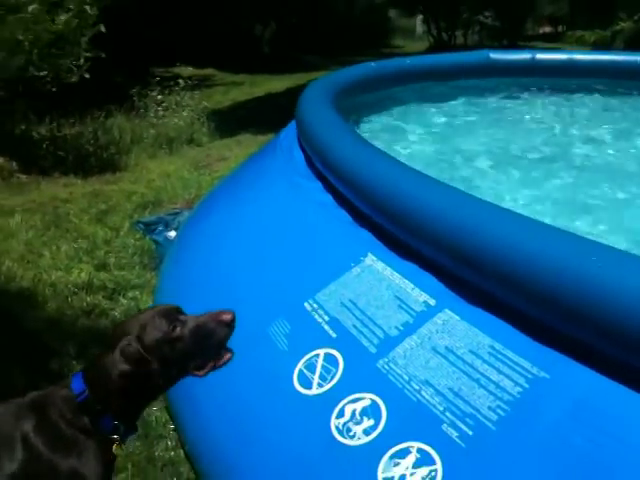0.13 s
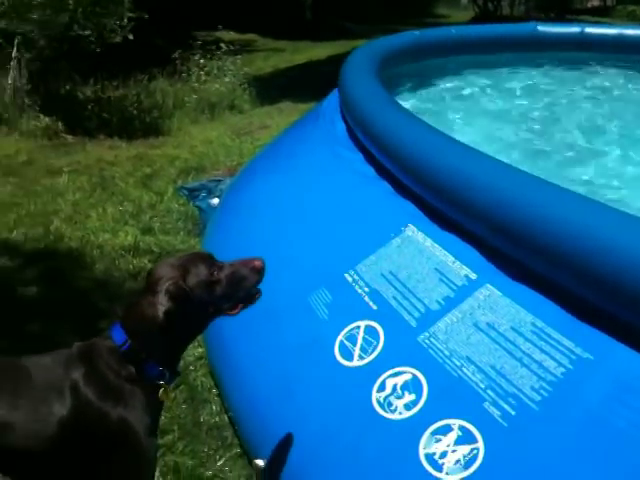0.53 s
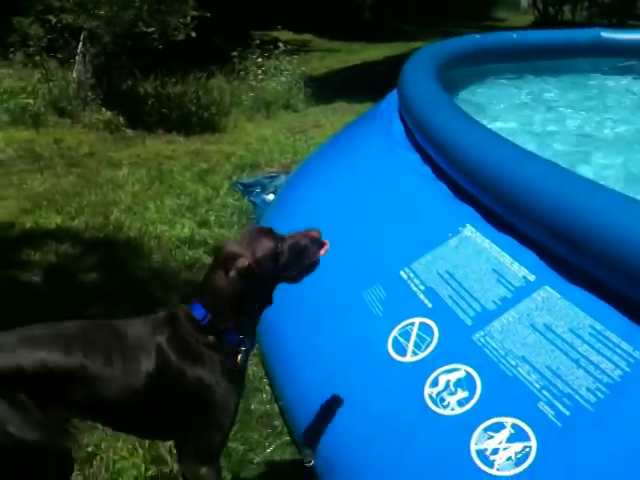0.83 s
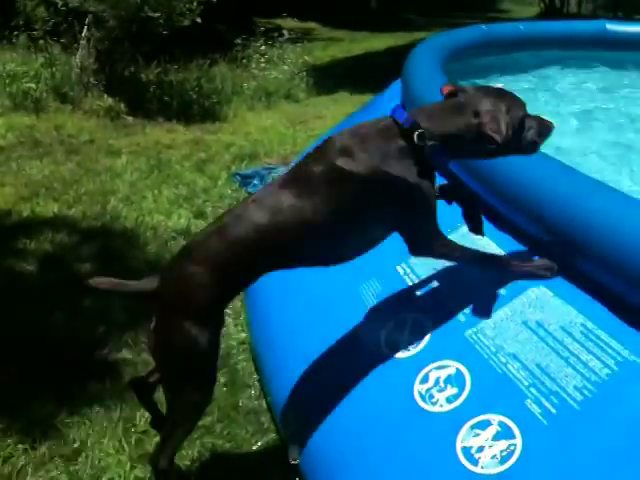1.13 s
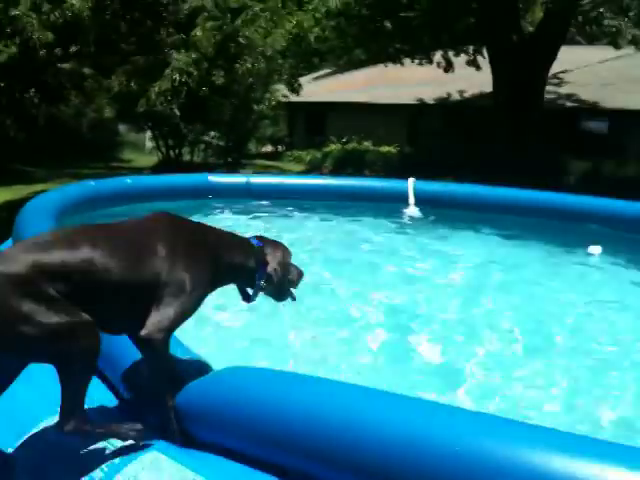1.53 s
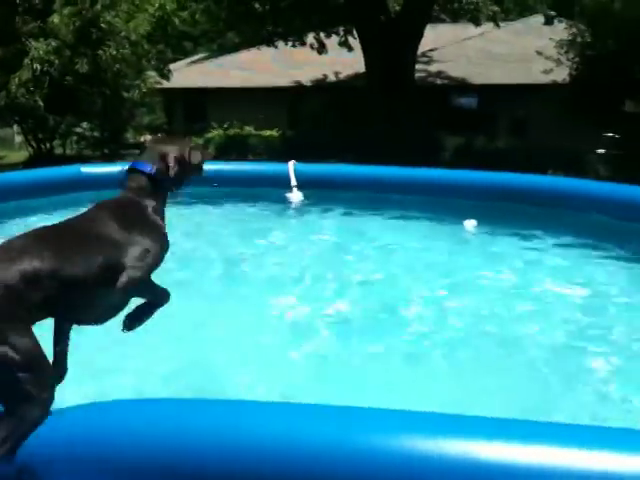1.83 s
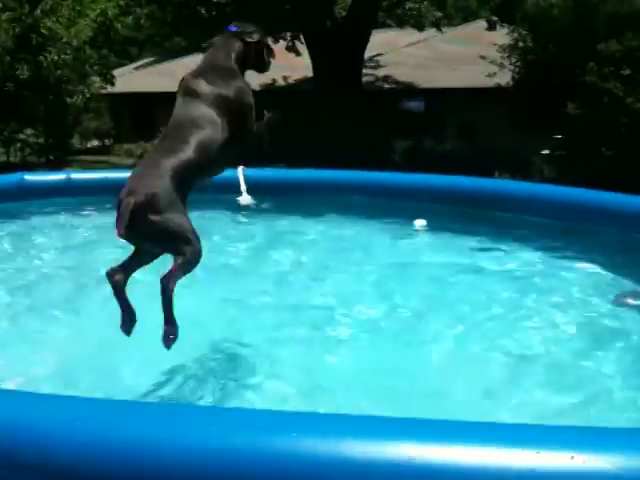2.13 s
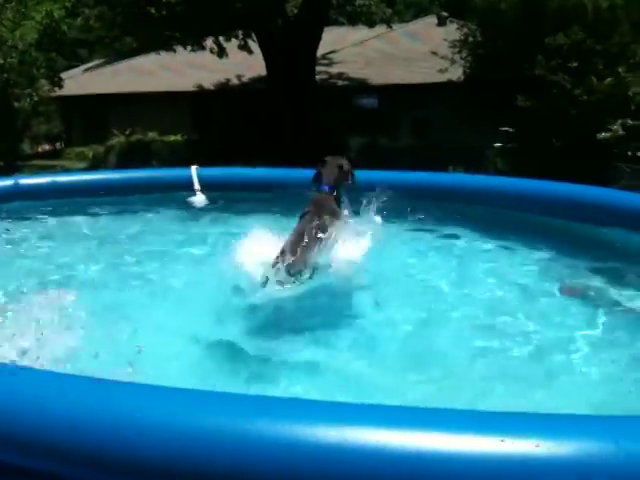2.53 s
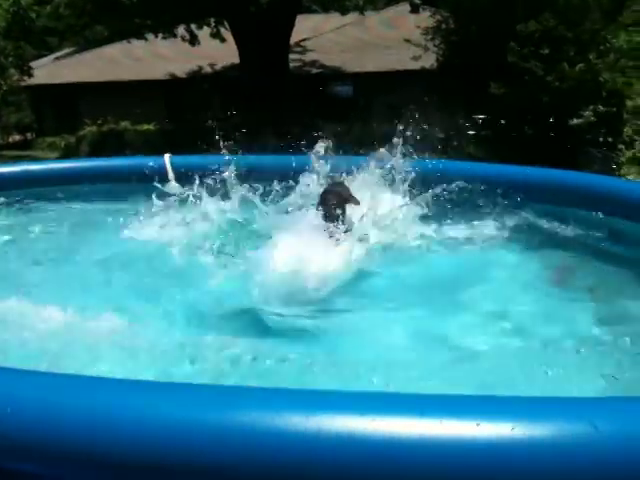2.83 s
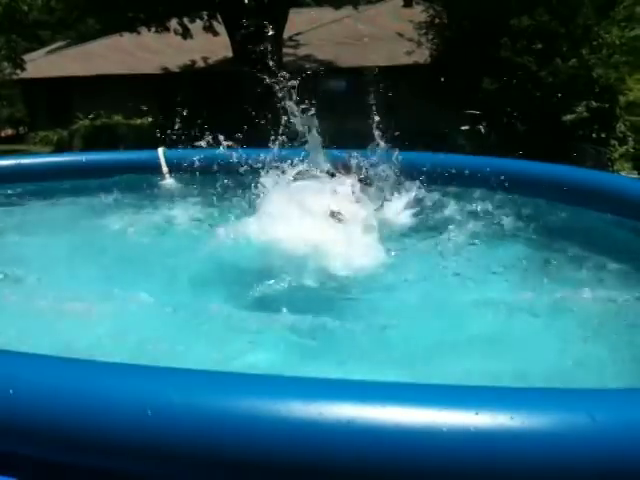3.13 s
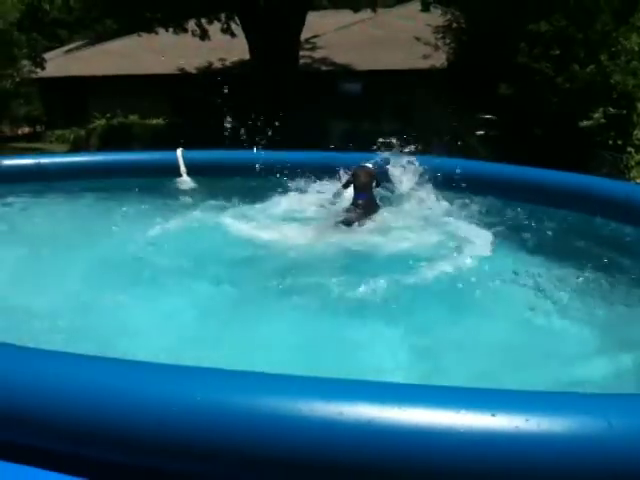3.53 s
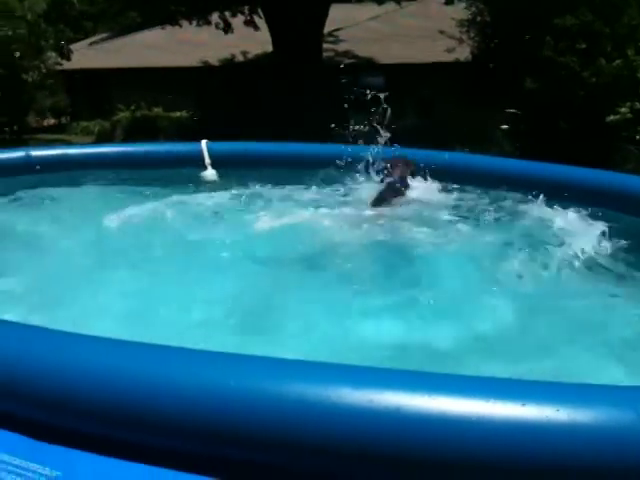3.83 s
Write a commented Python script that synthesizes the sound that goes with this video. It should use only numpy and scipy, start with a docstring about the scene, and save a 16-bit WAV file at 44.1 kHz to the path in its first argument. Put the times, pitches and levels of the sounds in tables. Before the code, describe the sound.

A dog's splash into an inflatable pool: quiet garden first, a wet slap, paws scrambling and squeaking on vinyl, then a sharp watery crash, glugs and churning, outdoors, on a handheld microphone with thin bass.

```python
"""A quiet garden with distant rush, faint hum and whine, and small ticks; then something slaps an inflatable pool.
A dog scrambles up the wet wall: water spills over the ring, pads squeak, and the air ring thumps under its paws.
It leaps and lands with a splash; spray, falling clumps of water, glugs, bubbles and sloshing follow.
Noise is shaped into rush, slaps, spills and cracks; short gliding sines make thumps, squeaks, glugs and bubbles.
The hits scatter in a short echo, and the microphone thins the deep bass and stops at a treble limit."""
import sys
import numpy as np
from scipy import signal
from scipy.fft import rfft, irfft, next_fast_len
from scipy.io import wavfile
from scipy.ndimage import uniform_filter1d, map_coordinates

SR = 44100
rng = np.random.default_rng(int(sys.argv[2]) if len(sys.argv) > 2 else 0)


def digitize_waveform(pressure):
    """Quantize a signal to 16-bit integers and store it at the path in sys.argv[1].

    Rows of a 2-D input are taken as channels; values are limited to [-1, 1].
    """
    field = np.atleast_2d(pressure).T
    bounded = np.clip(field, -1, 1)
    quanta = np.round(bounded * 32767).astype(np.int16)
    wavfile.write(sys.argv[1], SR, quanta)


N = 176400  # samples, 4 s


def amp(db):
    """dB to gain."""
    return 10 ** (np.asarray(db) / 20)


def unit(x):
    """Scaled to rms 1."""
    return x / np.sqrt(np.mean(x ** 2) + 1e-20)


def along(points, hz):
    """Values at hz, read between (frequency, value) points on a log axis."""
    f, v = np.transpose(points)
    return np.interp(np.log(hz + 1), np.log(f + 1), v)


def bell(centre_hz, width_oct, edge_db, floor_db):
    """A band that is edge_db down at width_oct octaves from its centre, never below floor_db."""
    return lambda f: np.maximum(-edge_db * (np.log2((f + 1) / centre_hz) / width_oct) ** 2, floor_db)


def wobble(rate):
    """A smooth random curve, rate knots a second."""
    knots = rng.standard_normal(int(N * rate / SR) + 4)
    return map_coordinates(knots, [np.arange(N) * rate / SR])


def coloured(x, spectrum):
    """The last axis of x filtered to a spectrum in dB."""
    n = x.shape[-1]
    m = next_fast_len(n + 2048)  # padding keeps the filter from wrapping round
    gain = amp(spectrum(np.fft.rfftfreq(m, 1 / SR)))
    return irfft(rfft(x, m) * gain, m)[..., :n]


def rush(spectrum, patchy_db):
    """Noise of rms 1 with patches of random gain in time and frequency."""
    z = signal.stft(rng.standard_normal(N), nperseg=256)[2]
    field = uniform_filter1d(rng.standard_normal(z.shape), size=5, axis=0)
    field = uniform_filter1d(field, size=7, axis=1)
    x = signal.istft(z * amp(patchy_db * unit(field)), nperseg=256)[1][:N]
    return unit(coloured(x, lambda hz: along(spectrum, hz)))


def place(s, rows):
    """Sum each row into the track from its start time."""
    at = np.round(np.asarray(s) * SR).astype(int)[:, None] + np.arange(rows.shape[1])
    return np.bincount(at.ravel(), rows.ravel(), N + rows.shape[1] + SR)[:N]


def blips(s, db, hz, cycles, rise, size, peak_at=0.28):
    """Bubble tones: a swell, a gliding pitch (by twice rise over the life), an end after some cycles."""
    t = np.arange(size) / SR
    life = (np.maximum(cycles, .5) / hz)[:, None]
    u = t / (peak_at * life)
    shape = (u * np.exp(1 - u)) ** 2.12
    tone = np.sin(2 * np.pi * hz[:, None] * t * (1 + rise * (t / life - .5)))
    return place(s, amp(db)[:, None] * shape * tone)


def swarm(spectrum, centre_hz, spread_oct, cycles, size_db, count, size):
    """Many random bubbles, together of rms 1, some larger than the rest."""
    hz = np.clip(centre_hz * 2 ** (spread_oct * rng.standard_normal(count)), 80, 16000)
    larger_db = size_db * np.minimum(rng.exponential(size=count), 3)
    db = larger_db + along(spectrum, hz) + 20 * np.log10(hz / centre_hz)
    starts = rng.uniform(0, N / SR, count)
    return unit(blips(starts, db, hz, cycles * rng.uniform(0.37, 1.41, count), 0.16, size))


def bursts(table, grains_db, cycles, tones_db, spread_db, rise):
    """Swells of uneven grit with ten short tones scattered through each."""
    s, length, db, hz, spread = np.transpose(table)[..., None]
    t = np.arange(6000) / SR
    lumps = uniform_filter1d(rng.standard_normal((len(s), len(t))), size=60, axis=1)
    grains = rng.standard_normal(lumps.shape) * amp(grains_db * lumps / lumps.std())
    band = coloured(grains, bell(hz, spread, edge_db=3, floor_db=-50))
    stroke = np.sin(np.pi * np.clip(t / length, 0, 1))
    grit = place(s[:, 0], amp(db) * stroke * band / band.std(axis=1, keepdims=True))
    when = rng.uniform(size=(len(s), 10))  # share of the swell
    pitch, loudness = np.moveaxis(rng.standard_normal((len(s), 10, 2)), 2, 0)
    level_db = db + tones_db + spread_db * loudness + 20 * np.log10(np.sin(np.pi * when))
    tone_hz = np.clip(hz * 2 ** (spread * pitch), 150, 12000)
    starts = s + length * when
    return grit + blips(starts.ravel(), level_db.ravel(), tone_hz.ravel(), cycles, rise, size=2500)


# Distant garden rush: (frequency [Hz], relative level [dB])
GARDEN_SPECTRUM = [(15, -53), (30, -1), (107, 2), (236, -3), (523, -8), (879, -11.5), (1610, -18),
                   (1890, -18), (7050, -21), (14000, -25), (15200, -24), (17400, -26)]
# Steady hum tones: (frequency [Hz], level [dB], 6 dB under the tone's peak)
HUM_TONES = [(161.5, -80.5), (242.2, -79.5), (301.5, -80.5)]
GARDEN_DB, HUM_WANDER = -64.5, .0015  # rush level; share of the hum pitch
WHINE_HZ, WHINE_WIDTH_HZ, WHINE_DB = 15030, 35, -85


def garden():
    """Distant outdoor rush of patchy noise, wandering hum sines and a faint narrow-band whine."""
    hum = 0
    for hz, db in HUM_TONES:
        turns = hz / SR * np.cumsum(1 + HUM_WANDER * wobble(47))
        hum = hum + amp(db + 6.0) * np.sin(2 * np.pi * turns)
    whine_band = lambda f: np.maximum(-6 * ((f - WHINE_HZ) / WHINE_WIDTH_HZ) ** 2, -80)
    whine = unit(coloured(rng.standard_normal(N), whine_band))
    distant = amp(GARDEN_DB + 0.13 * wobble(5.9)) * rush(GARDEN_SPECTRUM, patchy_db=1.95)
    return distant + hum + amp(WHINE_DB) * whine


# Small ticks and drops: (time [s], level [dB], pitch [Hz], 60 dB decay [s], share of broad crack [0-1])
SMALL_TICKS = [(0.144, -49, 1930, 0.0085, 0.65), (0.151, -47.5, 6290, 0.01, 0.1),
               (0.214, -52, 805, 0.0089, 0.3), (0.23, -38, 5720, 0.0069, 0.45),
               (0.314, -49, 2050, 0.011, 0.6), (0.323, -45, 2450, 0.0087, 0.5),
               (0.386, -42.5, 5300, 0.0081, 0.25), (0.492, -47, 1750, 0.014, 0.4),
               (0.511, -47.5, 860, 0.019, 0.2), (0.657, -48.5, 925, 0.014, 0.8),
               (0.915, -38, 3000, 0.014, 0.3), (0.976, -32.5, 6200, 0.0081, 0.47),
               (1.002, -41, 5980, 0.013, 0.6), (1.016, -37, 3730, 0.01, 0.1),
               (1.215, -31.5, 8700, 0.01, 0.43), (1.363, -53, 2030, 0.0091, 0.5),
               (1.427, -45, 1280, 0.012, 0.6), (1.485, -44, 2350, 0.015, 0.2),
               (1.598, -41, 6200, 0.009, 0.6), (1.605, -47, 4200, 0.011, 0.5),
               (1.686, -36, 5000, 0.0099, 0.6), (1.697, -28, 865, 0.0095, 0.44),
               (1.725, -29, 4820, 0.0084, 0), (1.846, -33, 880, 0.0091, 0.74),
               (1.879, -32.5, 3770, 0.0096, 0.3), (1.968, -42, 696, 0.017, 0.7),
               (2.018, -34, 9500, 0.015, 0.4), (2.182, -33, 1080, 0.008, 0.8),
               (2.419, -46, 1010, 0.01, 0.3), (3.827, -47, 820, 0.011, 0.3), (3.944, -34, 3470, 0.01, 0.3),
               (3.959, -28, 2730, 0.011, 0.6)]
TICK_OCT = 0.6  # octaves from the pitch to where the crack is 6 dB down


def ticks():
    """Each tick is a very short decaying ring mixed with a crack of noise about its pitch."""
    s, db, hz, t60, crack = np.transpose(SMALL_TICKS)[..., None]
    t, crack = np.arange(1500) / SR, np.clip(crack, 0, 1)
    noise = coloured(rng.standard_normal((len(s), len(t))), bell(hz, TICK_OCT, edge_db=6, floor_db=-60))
    ring = (1 - crack) * np.sin(2 * np.pi * hz * t)
    both = ring + crack * noise / noise.std(axis=1, keepdims=True)
    onset = np.minimum(t / 0.0011, 1)
    return place(s[:, 0], both * onset * amp(db - 60 * t / np.maximum(t60, .002)))


ECHO_DB, ECHO_T60_S = -15, .07


def echo(x):
    """A short scatter off the pool wall and water: a decaying noise tail that starts after 3 ms."""
    t = np.arange(SR // 4) / SR
    tail = rng.standard_normal(len(t)) * amp(-60 * t / ECHO_T60_S) * (t > .003)
    return signal.fftconvolve(x, tail / np.linalg.norm(tail))[:N]


# Water by phase (first slap, climb, balance, push-off, flight, landing, paddling):
# (time [s], spray and scuffing level [dB], burble level [dB], slosh level [dB])
WATER_LEVELS = [
    [(0.74, -88, -91, -74), (0.794, -60, -56, -80), (0.922, -63, -77, -93), (1.15, -69.5, -73, -77)],
    [(1.16, -60, -74, -80), (1.214, -56.5, -66, -54), (1.356, -60.5, -61.5, -55), (1.57, -60.5, -68, -73)],
    [(1.58, -58.5, -80, -72), (1.708, -50.5, -53, -59), (1.81, -58, -61.5, -65), (1.926, -55, -59.5, -52),
     (2.02, -64, -57, -59)],
    [(2.03, -55.5, -58.5, -50.5), (2.19, -48, -45, -49)],
    [(2.2, -53.5, -48.5, -54), (2.44, -56.5, -51, -50)],
    [(2.45, -53.5, -54, -48), (2.518, -47, -53, -55), (2.54, -38, -48, -48.5), (2.644, -39, -38, -39),
     (2.734, -38.5, -38, -39.5), (2.822, -42, -40, -41.5), (2.956, -38, -36, -40.5),
     (3.1, -39, -41.5, -46.5)],
    [(3.11, -41, -40.5, -51.5), (3.332, -41, -39.5, -45.5), (3.752, -44.5, -44.5, -57),
     (4.0, -42.5, -47, -52)],
]
# Colours of the three water layers, each (frequency [Hz], relative level [dB])
SPRAY_SPECTRUM = [(710, -50), (1200, -5), (1900, -13), (2630, -5.5), (2970, -11.5), (3510, -6.5),
                  (3970, -9), (5680, -7), (16500, -20), (17400, -27)]
BURBLE_SPECTRUM = [(240, -38), (400, 3), (512, -6.5), (912, 3), (1040, -2.5), (1900, -6), (2400, -6.5),
                   (3120, -17), (5280, -120)]
SLOSH_SPECTRUM = [(15, -61), (35, -4), (97, -38), (149, -0.5), (194, 2.5), (348, 1), (430, -1.5),
                  (512, -11.5), (600, -1.5), (780, -11), (1320, -120)]
LEAP_ENDS_S = 2.45  # scuffing grit before, sparse droplets after
GRIT_DB, GRIT_OCT, GRIT_SIZE_DB = -7, 1.2, 8  # level against the spray track
DROPS_DB, DROPS_HZ, DROPS_OCT, DROPS_CYCLES, DROPS_SIZE_DB = -11, 2400, .8, 6, 4  # level likewise


def water():
    """Patchy rush and bubble swarms make spray, burble and slosh; grit on the wall, then droplets, join."""
    s, *cols = np.concatenate(WATER_LEVELS).T
    t = np.arange(N) / SR
    spray_db, burble_db, slosh_db = [np.interp(t, s, c, left=-120) for c in cols]
    shared = 0.64 * wobble(34.67)  # dB, moves spray and burble together
    spray = 0.73 * rush(SPRAY_SPECTRUM, patchy_db=2.0)
    spray = spray + 0.37 * swarm(SPRAY_SPECTRUM, 4070, 0.845, 5.3, 4.2, count=7000, size=200)
    grit = swarm(SLAP_SPECTRUM, 3000, GRIT_OCT, 1.2, GRIT_SIZE_DB, count=1500, size=300)
    grit = amp(GRIT_DB) * (t < LEAP_ENDS_S) * grit
    drops = swarm(SPRAY_SPECTRUM, DROPS_HZ, DROPS_OCT, DROPS_CYCLES, DROPS_SIZE_DB, count=1600, size=500)
    drops = amp(DROPS_DB) * (t > LEAP_ENDS_S) * drops
    burble = 0.65 * rush(BURBLE_SPECTRUM, patchy_db=-1.0)
    burble = burble + 0.5 * swarm(BURBLE_SPECTRUM, 938, 0.557, 7.3, 1.6, count=1600, size=1200)
    slosh = 0.71 * rush(SLOSH_SPECTRUM, patchy_db=2.5)
    slosh = slosh + 0.42 * swarm(SLOSH_SPECTRUM, 264.0, 0.516, 5.4, 1.3, count=700, size=3000)
    bright = amp(spray_db + shared + 0.49 * wobble(110)) * (spray + grit + drops)
    middle = amp(burble_db + shared + 0.68 * wobble(30.35)) * burble
    return bright + middle + amp(slosh_db + 1.7 * wobble(15)) * slosh


# Wet slaps: (time [s], level [dB], strongest band [Hz], rise [s], 60 dB decay [s],
# sharp front over the noise [dB]); the noise crests at an rms 9.5 dB under the level
WET_SLAPS = [(0.7531, -23, 1880, 0.0011, 0.047, -15), (0.843, -42, 6400, 0.0058, 0.015, 4.5),
             (0.915, -36.5, 6360, 0.001, 0.023, 10), (0.9887, -40.5, 7040, 0.003, 0.022, 4.5),
             (1.258, -35.5, 1210, 0.004, 0.028, -2), (1.2745, -33, 1840, 0.001, 0.019, -12),
             (1.2816, -40, 1590, 0.0026, 0.025, 0), (1.3009, -43, 1680, 0.0026, 0.024, 4.5),
             (1.3434, -35.5, 1820, 0.0036, 0.013, 1), (1.357, -42, 4900, 0.005, 0.028, -5),
             (1.5797, -37, 6040, 0.0032, 0.019, 4.5), (1.7701, -30, 7440, 0.0021, 0.01, 4),
             (1.787, -33.5, 7700, 0.0014, 0.01, 8), (1.9943, -36, 1210, 0.004, 0.018, 3),
             (2.0993, -27, 4000, 0.0024, 0.058, 7), (2.1161, -23.5, 1670, 0.0017, 0.035, 2),
             (2.1296, -30, 1230, 0.0017, 0.095, 10), (2.15, -43, 1220, 0.0025, 0.025, 7),
             (2.317, -35, 4500, 0.002, 0.013, -2), (2.456, -28, 6500, 0.0055, 0.015, 0),
             (2.4786, -19, 5740, 0.0012, 0.013, -8), (2.4813, -18, 5650, 0.0015, 0.012, -8),
             (2.4856, -28, 1200, 0.004, 0.018, 1), (2.522, -17, 1700, 0.0005, 0.011, -12),
             (2.543, -24, 5500, 0.005, 0.04, -10), (2.5538, -17, 6700, 0.006, 0.024, -15),
             (2.5565, -17.5, 5260, 0.002, 0.019, -10), (2.5627, -18.5, 2410, 0.0023, 0.05, -5),
             (2.591, -16, 4550, 0.0037, 0.019, -13), (2.5955, -17, 2450, 0.001, 0.021, -11),
             (2.7799, -19.5, 1230, 0.0019, 0.039, 14), (2.94, -29, 1450, 0.0032, 0.028, -1),
             (3.2025, -25, 5400, 0.0022, 0.015, -4), (3.248, -29.5, 2090, 0.0034, 0.028, -12),
             (3.44, -26.5, 1340, 0.0031, 0.058, 4.5), (3.6814, -30, 5200, 0.0024, 0.02, 6),
             (3.699, -31, 6270, 0.0027, 0.018, 2), (3.8632, -27, 5340, 0.0026, 0.015, 4.5),
             (3.897, -26.5, 3540, 0.0021, 0.022, 0)]
# Colour common to slaps and scuffing grit: (frequency [Hz], relative level [dB])
SLAP_SPECTRUM = [(350, -67), (600, -9), (942, -3.5), (1960, -7.5), (2560, -4.5), (3690, -5.5), (7370, -7),
                 (17400, -21.5)]
SLAP_PEAK_DB, SLAP_PEAK_OCT = 10.5, 0.19  # boost of each slap's strongest band
SLAP_LOW_HZ, SLAP_LOW_POWER = 1000, 18  # steep low cut


def slaps():
    """Bright noise that builds to a sharp front and dies, each with its own strongest band."""
    s, db, hz, rise, t60, spike_db = np.transpose(WET_SLAPS)[..., None]
    t, rise = np.arange(5000) / SR, np.clip(rise, .0003, .02)

    def colour(f):
        boost = SLAP_PEAK_DB * np.exp(-.5 * (np.log2((f + 1) / hz) / SLAP_PEAK_OCT) ** 2)
        low_cut = 10 * np.log10(1 + (SLAP_LOW_HZ / (f + 1)) ** SLAP_LOW_POWER)
        return along(SLAP_SPECTRUM, f) + boost - low_cut

    noise = coloured(rng.standard_normal((len(s), len(t))), colour)
    decay = amp(-60 * np.maximum(t - rise, 0) / np.maximum(t60, .003))
    body = noise / noise.std(axis=1, keepdims=True) * np.minimum(t / rise, 1) ** 2 * decay
    spike = coloured(1. * (np.arange(len(t)) == np.round(rise * SR)), colour)
    front = amp(spike_db) * spike / spike.max(axis=1, keepdims=True)
    return place((s - rise / 2)[:, 0], (body - front) * amp(db - 9.5))


# Single bubbles: (time [s], peak level [dB], pitch [Hz], cycles [count], half the pitch climb [fraction])
SINGLE_BUBBLES = [(0.754, -35.5, 1090, 12, 0.03), (0.788, -47, 790, 8, 0.17), (0.808, -42, 820, 12, 0.03),
                  (0.832, -52, 840, 9, 0.03), (1.253, -41.5, 714, 4.9, 0.13), (1.756, -30, 800, 2.5, 0.11),
                  (1.774, -31, 664, 1.4, 0.32), (1.845, -52, 855, 7, 0.21), (1.993, -31.5, 630, 2.6, 0.095),
                  (2.103, -31.5, 1120, 7.8, 0.21), (2.117, -26.5, 897, 6.5, 0.55),
                  (2.317, -38, 1360, 10.5, 0.23), (2.374, -40, 816, 10, 0.32), (2.477, -30, 730, 4.2, 0.25),
                  (2.521, -26, 1130, 6.1, 0.31), (2.571, -28, 763, 7.1, 0.17), (2.632, -36, 650, 4.7, 0.29),
                  (2.662, -26, 890, 6.3, 0.21), (2.683, -31, 930, 5.3, 0.25), (2.779, -20, 850, 4, 0.096),
                  (2.875, -29, 890, 8, 0.16), (2.91, -39, 780, 7.1, 0.12), (2.936, -36, 626, 6.7, 0.22),
                  (2.98, -25.5, 664, 5.5, 0.17), (3.013, -35, 764, 5.6, 0.12), (3.046, -51, 920, 5, 0.25),
                  (3.079, -42, 443, 12.5, 0.25), (3.124, -33.5, 600, 7.3, 0.16), (3.134, -36, 640, 4, 0.27),
                  (3.204, -48, 1460, 8.1, 0.23), (3.251, -30, 850, 3.8, 0.2), (3.365, -32, 980, 3.4, 0.25),
                  (3.384, -35.5, 720, 8.1, 0.16), (3.431, -32.5, 497, 5.5, 0.32),
                  (3.44, -31.5, 740, 8.9, 0.33), (3.619, -35, 940, 7.5, 0.13), (3.744, -37, 840, 4.9, 0.23)]


def bubbles():
    """Each bubble rings briefly at its own pitch, climbing as it dies."""
    s, db, hz, cycles, rise = np.transpose(SINGLE_BUBBLES)
    return blips(s, db, hz, cycles, rise[:, None], size=4000)


# Hard single contacts of claws and water:
# (time [s], peak level [dB], centre [Hz], spread to 6 dB down [octaves])
HARD_CRACKS = [(0.7546, -24, 2220, 1), (1.2527, -42, 1300, 1.2), (1.259, -35, 4000, 1),
               (1.274, -29, 2500, 1.8), (1.2848, -38, 1400, 1.1), (1.342, -39, 2500, 1.8),
               (1.363, -38, 4000, 1.1), (1.475, -44, 2500, 1), (1.6245, -38, 1600, 1),
               (1.698, -34, 1500, 1.8), (1.7565, -28, 1290, 1.04), (1.7772, -32, 2000, 1.8),
               (1.8474, -32, 2000, 1.7), (2.318, -31.5, 4850, 0.44), (2.386, -38, 8000, 0.45),
               (2.4777, -24, 1510, 1.8), (2.512, -30, 6000, 1.1), (2.5225, -9.5, 2300, 1.24),
               (2.556, -9.5, 6000, 0.69), (2.5943, -15.5, 3200, 1), (2.6655, -24, 1100, 1.2),
               (2.877, -37, 1500, 1.3), (3.2025, -27, 5360, 0.25)]


def cracks():
    """One downward spike each, coloured about its centre."""
    s, db, hz, spread = np.transpose(HARD_CRACKS)[..., None]
    lead = 300  # samples before the spike, room for its filtered front
    band = bell(hz, np.maximum(spread, .1), edge_db=6, floor_db=-60)
    spike = coloured(1. * (np.arange(2 * lead) == lead), band)
    return place(s[:, 0] - lead / SR, -amp(db) * spike / spike.max(axis=1, keepdims=True))


# Water spilling over the ring:
# (start [s], length [s], grit rms at the crest [dB], centre [Hz], spread [octaves])
RING_SPILLS = [(0.761, .11, -68, 830, 0.13), (0.937, 0.04, -67.5, 600, 0.3),
               (0.977, 0.056, -56.5, 4640, 0.85), (1.091, 0.051, -66.5, 730, 0.34),
               (1.195, 0.049, -59, 3020, 1.18), (1.25, 0.047, -49.5, 1450, 0.94),
               (1.306, 0.026, -56.5, 1070, 0.71), (1.344, 0.037, -56.5, 4300, 0.91),
               (1.375, 0.11, -61, 1030, 0.39), (1.625, 0.066, -58, 1120, 0.52),
               (1.67, 0.12, -54, 2000, 1.02), (1.842, 0.017, -57.5, 1075, 0.33),
               (1.874, 0.046, -56, 1160, 0.31), (2.043, .05, -60, 910, 0.65), (2.079, 0.096, -39, 1520, 1),
               (2.203, 0.065, -50, 1360, 0.17), (2.261, 0.028, -52.5, 4740, 0.61)]


def spills():
    """Each spill is a swell of uneven grit with short tones in it."""
    return bursts(RING_SPILLS, grains_db=6.5, cycles=10.4, tones_db=3.5, spread_db=1.5, rise=0.025)


# Pads squeaking on the wet vinyl: (time [s], peak level [dB], pitch [Hz], cycles [count])
PAD_SQUEAKS = [(1.205, -55, 2300, 28), (1.263, -44, 1070, 8.3), (1.266, -42.5, 2100, 15),
               (1.301, -44, 2100, 9), (1.316, -47, 1100, 7.7), (1.369, -53, 2100, 11),
               (1.378, -52, 950, 11), (1.398, -57, 1320, 15), (1.405, -55, 890, 16), (1.432, -53, 1340, 14),
               (1.45, -53, 1370, 15), (1.428, -46.5, 5750, 27), (1.663, -44, 1390, 11), (1.68, -46, 845, 7),
               (1.719, -43, 1150, 6.4), (1.727, -43, 1590, 6.5), (1.81, -51, 2820, 9),
               (1.853, -41.5, 1050, 4)]


def squeaks():
    """Short tones whose pitch sags as they go."""
    s, db, hz, cycles = np.transpose(PAD_SQUEAKS)
    return blips(s, db, hz, cycles, rise=-.05, size=4000)


# Paw thumps on the air ring: (time [s], peak level [dB], pitch [Hz], cycles [count])
RING_THUMPS = [(1.208, -63, 326, 2.9), (1.256, -44, 328, 2.1), (1.272, -32.5, 320, 1.8),
               (1.281, -33.5, 510, 2), (1.299, -32, 290, 2.8), (1.314, -44, 328, 2.5), (1.325, -45, 330, 4),
               (1.341, -34, 310, 3.5), (1.351, -44, 325, 3.8), (1.431, -44, 213, 1.5),
               (1.515, -38.5, 326, 3.2), (1.722, -42.5, 234, 5.7), (1.737, -37, 290, 2.9),
               (1.754, -31.5, 332, 2.4), (1.773, -32.5, 296, 3.2), (1.845, -47, 273, 3.8),
               (1.882, -40, 298, 3.3), (1.921, -39.5, 394, 5.7), (1.952, -48, 220, 7.4),
               (1.974, -33, 313, 3.4), (1.993, -28.5, 301, 5.9), (2.054, -42, 314, 4.1),
               (2.103, -32, 307, 5.7), (2.118, -32, 419, 3.6), (2.147, -26.5, 320, 3.4)]
TONE_DELAY_S = .002  # thump and glug tones start this long after their listed times


def thumps():
    """The air ring rings low for a few cycles under each paw, its pitch climbing a little."""
    s, db, hz, cycles = np.transpose(RING_THUMPS)
    return blips(s + TONE_DELAY_S, db, hz, cycles, rise=0.048, size=4000)


# Big air pockets closing:
# (time [s], peak level [dB], pitch [Hz], cycles [count], half the pitch climb [fraction])
AIR_GLUGS = [(2.245, -41, 260, 4.5, 0.22), (2.318, -40, 406, 5.3, 0.84), (2.359, -48, 223, 3.8, 0.4),
             (2.473, -36.5, 420, 4.4, 0.28), (2.561, -34, 184, 3.7, 0.6), (2.633, -30, 498, 3.1, 0.5),
             (2.634, -34, 170, 3.1, 0.13), (2.657, -32, 194, 3.7, 0.27), (2.709, -37, 232, 3.9, 0.31),
             (2.756, -29, 288, 3.9, 0.3), (2.785, -33, 203, 2.9, 0.36), (2.834, -38, 180, 4.6, 0.28),
             (2.904, -31, 414, 3.1, 0.39), (2.966, -27.5, 230, 6.2, 0.52), (2.977, -28.5, 240, 3.4, 0.23),
             (3.02, -46, 420, 1.9, 0.44), (3.163, -38.5, 184, 5.7, 0.17), (3.209, -39, 175, 6.1, 0.36),
             (3.428, -40, 160, 6.6, 0.18), (3.617, -27.5, 340, 5.1, 0.24)]


def glugs():
    """A large pocket of air closes with a low tone that climbs."""
    s, db, hz, cycles, rise = np.transpose(AIR_GLUGS)
    return blips(s + TONE_DELAY_S, db, hz, cycles, rise[:, None], size=4000)


# Thrown water falling back in clumps:
# (start [s], length [s], noise rms at the crest [dB], centre [Hz], spread [octaves])
WATER_CLUMPS = [(2.49, 0.02, -45, 910, 0.78), (2.53, 0.057, -37.5, 4500, 1.23),
                (2.565, 0.048, -40, 800, 0.34), (2.625, 0.047, -33.5, 452, 1.09),
                (2.68, 0.028, -45, 930, 0.68), (2.745, 0.063, -41, 328, 1.1), (2.9, 0.026, -36, 614, 0.71),
                (2.93, 0.063, -41.5, 805, 0.91), (3.11, 0.042, -40, 1220, 1.29),
                (3.24, 0.024, -40.5, 1980, 1.54), (3.43, .07, -41.5, 1050, 0.66),
                (3.585, 0.029, -43.5, 2000, 1), (3.62, 0.083, -47.5, 705, 0.83),
                (3.69, 0.015, -44, 2970, 0.85), (3.92, 0.087, -46.5, 1510, 0.81)]


def clumps():
    """Each clump is a swell of uneven noise with short climbing bubble tones in it."""
    return bursts(WATER_CLUMPS, grains_db=2.5, cycles=4.9, tones_db=0.0, spread_db=0.0, rise=0.18)


def scene():
    """Hits with their scatter, over the water and the garden."""
    noisy_hits = ticks() + slaps() + cracks() + spills() + clumps()
    hits = noisy_hits + bubbles() + squeaks() + thumps() + glugs()
    return (hits + amp(ECHO_DB) * echo(hits) + water() + garden())[None]


LOW_CUT_HZ, LOW_CUT_ORDER, TOP_HZ = 115, 3, 17450


def record(dry):
    """The microphone loses up to 12 dB of deep bass and drops 70 dB above the band limit."""
    bass_loss = lambda hz: 10 * np.log10(1 + (LOW_CUT_HZ / (hz + 1)) ** (2 * LOW_CUT_ORDER))
    return coloured(dry, lambda hz: np.maximum(-bass_loss(hz), -12) + np.where(hz < TOP_HZ, 0, -70))


dry = scene()
out = record(dry)
digitize_waveform(out)
```